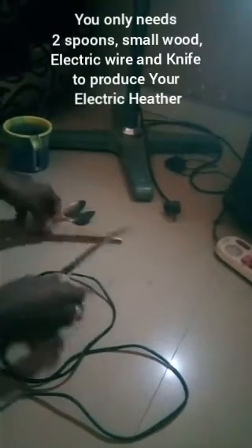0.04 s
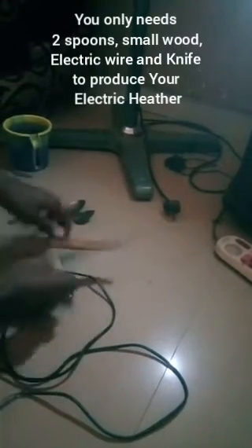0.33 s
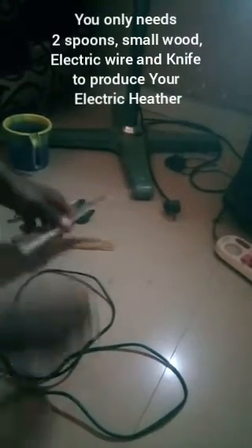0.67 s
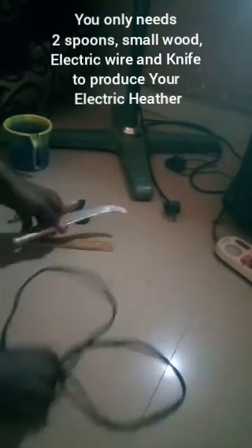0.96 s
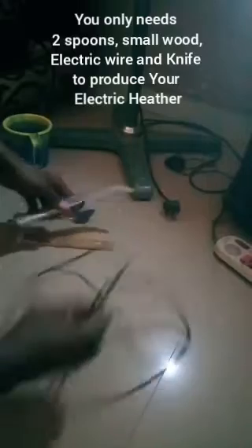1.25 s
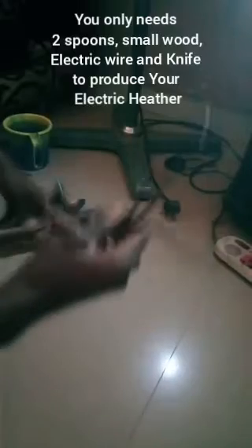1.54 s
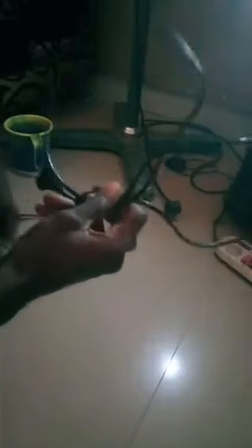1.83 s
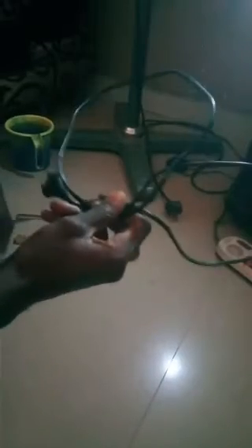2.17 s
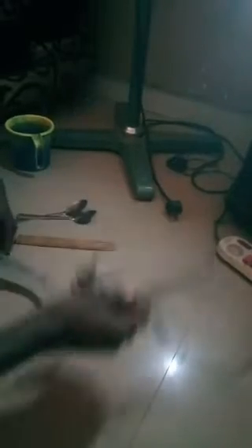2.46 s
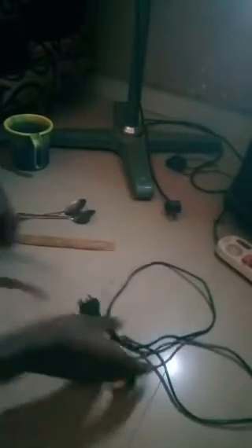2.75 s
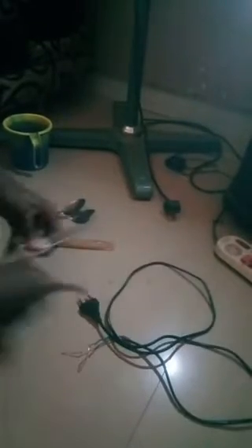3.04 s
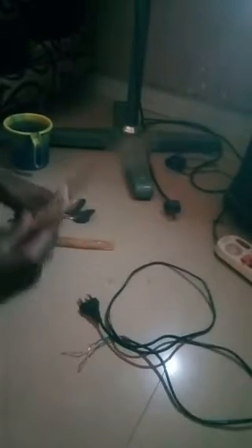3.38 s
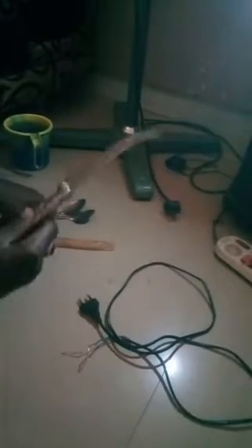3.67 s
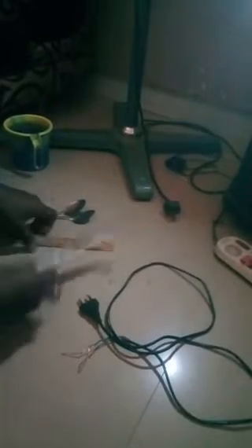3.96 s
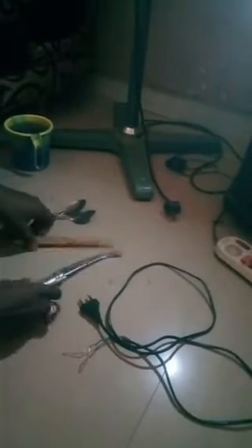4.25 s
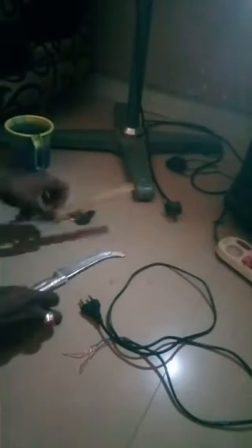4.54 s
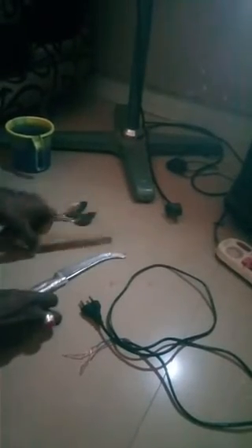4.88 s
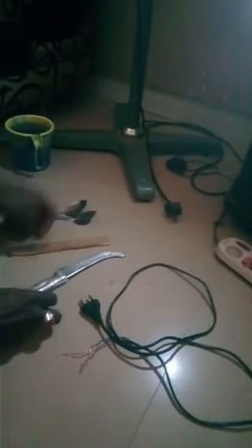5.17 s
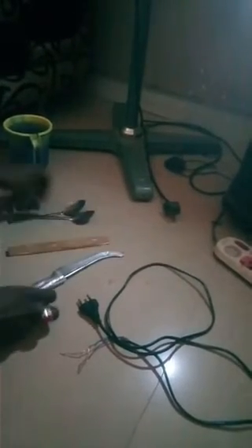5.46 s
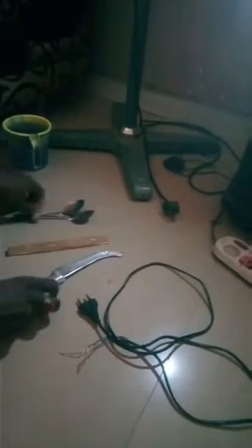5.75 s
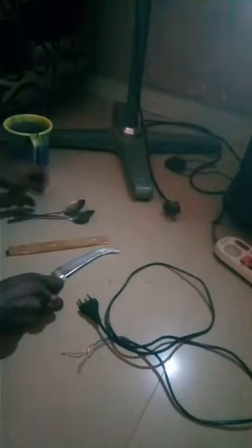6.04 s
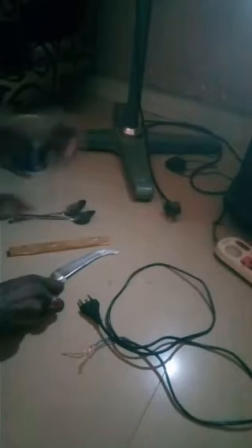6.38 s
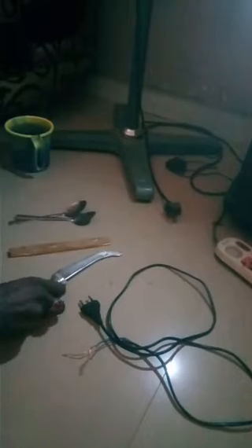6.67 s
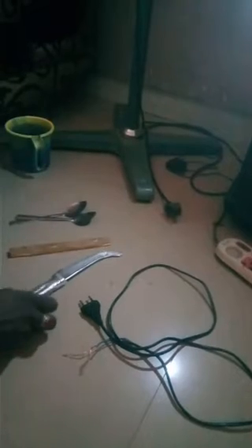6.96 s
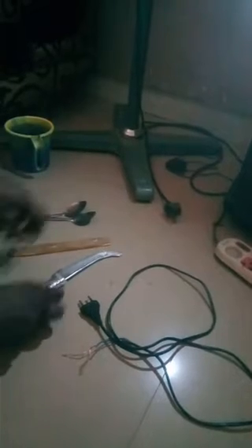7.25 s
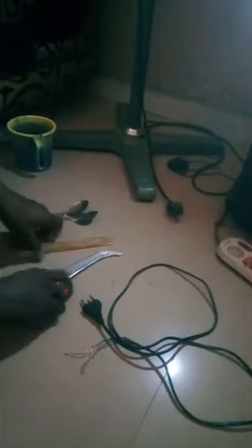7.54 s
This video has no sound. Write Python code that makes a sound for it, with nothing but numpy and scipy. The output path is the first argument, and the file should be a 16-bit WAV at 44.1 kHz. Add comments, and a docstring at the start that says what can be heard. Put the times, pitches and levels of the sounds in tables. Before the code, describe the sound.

In a small, quiet room, hands and a power cord slide faintly over a tiled floor with soft bumps. A knife is put down with dry taps, then a plug ticks on the tile. Midway, two steel spoons tumble together in a loud, bright, ringing clatter. A wooden stick and the knife tap lightly, and the spoons clink in three short bursts. The sound is close, with a short echo.

```python
"""In a small, quiet room, hands and a mains lead slide and softly bump over a tiled floor throughout. First a
knife is picked up with dry taps, then the plug. Just after 4 s two steel spoons tumble against each other and
the tile: each hit makes a sharp crack and sets their bowls and handles ringing. A wooden stick taps at 5 s,
then the knife again. From 6 s the spoons clink in three short bursts, with a fingernail tap before the last
one."""
import sys
import numpy as np
from scipy import signal
from scipy.fft import rfft, irfft
from scipy.io import wavfile

SR = 44100
rng = np.random.default_rng(int(sys.argv[2]) if len(sys.argv) > 2 else 0)


def dump(signal):
    """Clip the signal to [-1, 1] and save it as 16-bit WAV at the path in sys.argv[1]."""
    limited = np.clip(np.atleast_2d(signal).T, -1, 1)
    pcm = np.round(limited * 32767).astype(np.int16)
    wavfile.write(sys.argv[1], SR, pcm)


N = 340011
TIME = np.arange(N) / SR
# each hit of the spoons: (time [s], crack level [dB], pitch of the hit [Hz],
# ring of the first bowl [dB], ring of the second bowl [dB])
SPOON_HITS = [ (4.1845, -26.5, 4780, -35, -42.5), (4.1904, 0.5, 4310, -36, -38.5),
              (4.2562, -6.5, 3610, -27, -34.5), (4.2800, -8.5, 4700, -26, -25.5),
              (4.2984, -9.5, 3407, -32, -43), (4.3053, -12.5, 5000, -38.5, -34.5),
              (4.3191, -10, 3950, -33.5, -24), (4.3464, -23.5, 5000, -38.5, -29),
              (4.3724, -12, 4280, -34.5, -20.5), (4.3824, -3.5, 4100, -11.5, -21),
              (4.3922, -8.5, 4144, -19, -25), (4.4076, -17, 4280, -30, -18.5),
              (4.4288, -5.5, 5150, -25, -20), (4.4381, -9.5, 4210, -23.5, -16.5),
              (4.4464, -10, 5006, -20, -26.5), (4.4512, -12, 5000, -17.5, -30.5),
              (4.4608, -10.5, 5010, -29.5, -28.5), (4.4730, -19.5, 4570, -42, -23),
              (4.4804, -18, 5330, -26.5, -26.5), (4.4884, -6.5, 5170, -38, -23),
              (4.5084, -29, 4640, -22, -25), (4.5243, -20.5, 4800, -36, -35),
              (4.5324, -29, 4940, -37.5, -27), (5.9660, -51, 4800, -76, -58),
              (5.9848, -44, 3960, -83, -53.5), (6.719, -23, 3800, -64.5, -41),
              (6.7216, -8, 4400, -38.5, -18.5), (6.7324, -14.5, 4720, -29, -24),
              (6.7454, -15, 4780, -36, -53), (6.7735, -19, 4800, -33.5, -48),
              (7.646, -42, 3860, -51, -41.5), (7.659, -28, 5050, -74, -47),
              (7.6720, -25.5, 4230, -27.5, -32), (7.676, -26, 4500, -36, -51)]


def spoons(crack_db=-5, tumble_start_s=4.18, tumble_end_s=4.55):
    """Each hit cracks and sets the steel ringing; the handles ring most while the spoons tumble."""
    # tone colour of a crack on steel: (frequency [Hz], level [dB])
    steel_colour = [(150, -47.5), (400, -33), (650, -34), (1100, -26), (2000, -11.5), (2750, -17.5),
                    (3450, -3.5), (4400, -2), (4850, -3.5), (5450, -1), (6700, -5.5), (7600, -24),
                    (10000, -34.5), (12000, -46), (15500, -47)]
    # the notes each part rings at, high for the bowls and lower for the handles: (frequency [Hz])
    first_bowl_hz = [4544, 5004, 5122, 5237, 5274, 5324, 5365, 5650, 6702, 8450, 9520, 14190]
    second_bowl_hz = [2027, 3044, 3800, 4055, 4240, 4513, 4548, 4606, 5045, 6320, 8150, 9560, 10450]
    handle_hz = [1070, 1247, 1860, 2532, 3040, 3890, 4540]
    # the same notes, in the same order: (level [dB], time to fade by 60 dB [s])
    first_bowl_ring = [(-13.5, 0.15), (-0.5, 0.19), (-12.5, .26), (-13.5, 0.42), (-13, 0.14), (-5, 0.32),
                       (-12, .24), (-16, 0.29), (-10, 0.24), (-42.5, .15), (-33.5, 0.19), (-45.5, .15)]
    second_bowl_ring = [(-21.5, 0.29), (-6.5, 0.3), (-16.5, .15), (-19.5, .15), (0.5, 0.25), (-15.5, .18),
                        (-12, 0.18), (-13.5, 0.13), (-2.5, .36), (-12, .2), (-25.5, 0.15), (-26, 0.18),
                        (-37, 0.11)]
    handle_ring = [(-10, 0.3), (-16, .25), (-5.5, 0.78), (-7.5, 0.2042), (-8.5, 0.16), (3, 0.089),
                   (-11.5, 0.11)]
    parts = [(first_bowl_hz, first_bowl_ring), (second_bowl_hz, second_bowl_ring),
             (handle_hz, handle_ring)]
    part_notes = [(hz, ringing(np.c_[hz, ring], twin=0.27)) for hz, ring in parts]
    cracks, rings = np.zeros((2, N))
    for start_s, db, pitch_hz, first_db, second_db in SPOON_HITS:
        tilt_db_per_octave = max(5.1 + 0.63 * db, -3.5)  # a stronger hit is brighter
        click = crack(steel_colour, pitch_hz, tilt_db_per_octave, focus_db=7)
        add(cracks, start_s, from_db(db + crack_db) * chatter(click, rebound=0.68, settle_s=0.003))
        ring_left = damping(start_s)
        handle_db = db + (-25 if tumble_start_s < start_s < tumble_end_s else -42)
        for (hz, sines), gain in zip(part_notes, from_db([first_db, second_db, handle_db])):
            ring = strike(hz, sines, pitch_hz, focus_db=8.5, octaves=0.14)
            add(rings, start_s, gain * ring_left * ring)
    return cracks + rings + room(from_db(-3.5) * cracks + from_db(-5.5) * rings)


def damping(start_s, settle_s=0.0075, floor_db_per_s=180):
    """How much of a ring is left: later hits choke it, and the floor stills it once the spoons rest."""
    t = start_s + TIME[:SR // 2]
    # each later hit takes its share within 2 ms; a lighter one takes more
    choke_db = sum(max(6.5 - 0.1 * db, 0) * np.clip((t - later_s) / 0.002, 0, 1)
                   for later_s, db, *_ in SPOON_HITS if start_s < later_s < t[-1])
    resting_s = np.maximum(t - clatter_end(start_s) - settle_s, 0)
    return from_db(-choke_db - floor_db_per_s * resting_s)


def clatter_end(hit_s, pause_s=0.15):
    """Follow the spoon hits from hit_s on and give the time of the last one before a pause."""
    for later_s in sorted(row[0] for row in SPOON_HITS):
        if hit_s < later_s < hit_s + pause_s:
            hit_s = later_s
    return hit_s


def taps(crack_db=-3, even_tap_hz=4300):
    """Knife, plug, stick and fingernail crack on the tile and ring briefly, pitched by their size."""
    # each tap: (time [s], crack level [dB], pitch of the hit [Hz], object name)
    tile_taps = [ (0.28, -29, 5500, "knife"), (0.2834, -18.5, 3680, "knife"), (0.285, -28.5, 5860, "knife"),
                 (0.3004, -44, 3600, "knife"), (0.3560, -36, 3370, "knife"), (1.2500, -45, 5960, "plug"),
                 (1.2618, -37, 6100, "plug"), (2.5997, -30, 4450, "plug"), (2.608, -38, 4720, "plug"),
                 (2.6371, -21, 4330, "plug"), (2.6631, -24, 6560, "plug"), (2.6685, -24, 7160, "plug"),
                 (2.7980, -35, 4660, "plug"), (2.8401, -31, 4440, "plug"), (5.0052, -29, 3720, "stick"),
                 (5.1953, -24, 5000, "stick"), (5.2003, -25.5, 3770, "stick"),
                 (5.2498, -30.5, 3580, "stick"), (5.74, -37.5, 4530, "knife"), (5.7633, -42, 3400, "knife"),
                 (7.1430, -37.5, 5630, "fingernail")]
    # for each object name: (lowest note [Hz], ring added to the tap's level [dB], room share [dB])
    objects = {"knife": (1820, -29, -4.5), "plug": (1050, -37, -7), "stick": (1900, -23, -5),
               "fingernail": (2820, -38, -14)}
    # notes of the short ring: (multiple of the lowest note, level [dB], time to fade by 60 dB [s])
    tap_notes = [(1, 3, 0.03), (1.031, -1.5, 0.05), (1.52, -6, 0.026), (1.871, 5, 0.036),
                 (2.24, 9.5, 0.015), (2.85, -4, 0.024)]
    # tone colour of a tap's crack: (frequency [Hz], level [dB])
    tap_colour = [(200, -27), (600, -29.5), (1000, -25), (2200, -9), (2900, -3), (3700, 0.5), (5500, 3.5),
                  (6600, -5.5), (7800, -19.5), (10500, -35), (13000, -48), (15500, -52)]
    direct, to_room = np.zeros((2, N))
    for start_s, db, pitch_hz, name in tile_taps:
        lowest_hz, ring_db, room_db = objects[name]
        notes = np.array(tap_notes) * [lowest_hz, 1, 1]
        ring = strike(notes[:, 0], ringing(notes), pitch_hz, focus_db=4, octaves=0.1)
        knock = from_db(db + ring_db) * ring
        tilt_db_per_octave = 18 * np.log2(pitch_hz / even_tap_hz)  # a sharper tap is higher and brighter
        click = crack(tap_colour, pitch_hz, tilt_db_per_octave, focus_db=9)
        add(knock, 0, from_db(db + crack_db) * chatter(click, rebound=0.94, settle_s=0.002))
        add(direct, start_s, knock)
        add(to_room, start_s, from_db(room_db) * knock)
    return direct + room(to_room)


def crack(colour, pitch_hz, tilt_db_per_octave, focus_db, size=2048):
    """The click of two hard things meeting, with a peak of 1; more tilt makes it brighter."""
    hz = np.fft.rfftfreq(size, 1 / SR)
    tilt_db = tilt_db_per_octave * np.log2(np.maximum(hz, 500) / pitch_hz)
    db = at_hz(colour, hz) + favour_db(hz, pitch_hz, focus_db, octaves=0.17) + tilt_db
    # keep the tone colour but pack the energy at the very start (minimum phase)
    cepstrum = irfft(np.log(from_db(db)))
    cepstrum[size // 2:] = 0
    click = irfft(np.exp(2 * rfft(cepstrum)))
    return click / np.abs(click).max()


def chatter(click, rebound, settle_s, count=9):
    """A light object bounces several times within a few milliseconds, ever more weakly."""
    click = np.pad(click, (0, SR // 20))
    delays_s = np.cumsum(rng.uniform(0.00037, 0.0014, count))
    sizes = rng.choice([-1, 1], count) * rebound * np.exp(-delays_s / settle_s)
    return click + sum(size * np.roll(click, round(s * SR)) for s, size in zip(delays_s, sizes))


def ringing(notes, contact_s=0.0005, twin=0, detune=0.0057):
    """One fading sine per note, growing while the hit lasts; a slightly higher twin makes it waver."""
    hz, db, fade_s = np.transpose(notes)[:, :, None]
    t = TIME[:SR // 2]
    phase = 2 * np.pi * hz * t
    sines = np.sin(phase) + twin * np.sin(phase * (1 + detune))
    attack = 1 - np.exp(-(t / contact_s) ** 2)
    return from_db(db - 60 * t / fade_s) * sines * attack


def strike(hz, sines, pitch_hz, focus_db, octaves, spread_db=2.5):
    """Each hit sets the notes going in its own, partly random, mix."""
    db = favour_db(hz, pitch_hz, focus_db, octaves) + spread_db * rng.standard_normal(len(hz))
    return from_db(db) @ sines


def favour_db(hz, pitch_hz, depth_db, octaves):
    """The spot that is struck favours one pitch; frequencies far from it are depth_db weaker."""
    return depth_db * (np.exp(-(np.log2(np.maximum(hz, 1) / pitch_hz) / octaves) ** 2) - 1)


def sliding(hiss_db=-3.5, drag_db=-7.0):
    """With each stroke, skin hisses on the tile and the cable drags with a lower rasp."""
    # each stroke over the floor: (start [s], length [s], skin level [dB], cable level [dB])
    strokes = [ (0.0, 0.041, -58, -51.5), (0.028, 0.38, -58.5, -65.5), (0.309, 0.061, -83, -52),
               (0.54, 0.09, -62, -59.5), (0.655, 0.14, -56.5, -63.5), (0.754, 0.21, -63.5, -66),
               (0.897, 0.092, -68, -59), (0.985, 0.23, -64.5, -65.5), (1.227, 0.056, -62.5, -82),
               (2.51, 0.2, -62.5, -62.5), (2.703, 0.28, -66, -70.5), (3.32, 0.07, -68.5, -72),
               (3.754, 0.22, -65.5, -67), (3.958, 0.31, -65.5, -64.5), (4.87, 0.24, -62.5, -67),
               (5.593, 0.071, -68, -78.5), (5.87, 0.14, -65.5, -69.5), (6.5, 0.26, -62.5, -74.5),
               (6.889, 0.14, -61.5, -67), (7.176, 0.44, -58.5, -74)]
    # tone colours of sliding skin and dragging cable: (frequency [Hz], level [dB])
    skin_colour = [(1470, -25.5), (2500, -10), (2980, -13), (3150, -3.5), (3580, -2), (4290, 1.5),
                   (4620, 2.5), (6140, -3), (7790, -27), (10000, -41.5), (13000, -46), (22000, -120)]
    cable_colour = [(300, -6.5), (520, -10), (780, 1.5), (1200, -2.5), (1700, 5), (2050, 2.5),
                    (2700, -23.5), (4000, -35)]
    skin, cable = np.zeros((2, N))
    for start_s, length_s, skin_db, cable_db in strokes:
        speed = envelope(start_s, length_s, rise_s=0.1, fall_s=0.024)
        skin = np.maximum(skin, from_db(skin_db + hiss_db) * speed)
        cable = np.maximum(cable, from_db(cable_db + drag_db) * speed)
    hiss = skin * noise(skin_colour) * grip(per_s=56, depth_db=1.5)
    rasp = cable * noise(cable_colour) * grip(per_s=28, depth_db=2.0)
    return hiss + rasp


def grip(per_s, depth_db):
    """One surface grips another unevenly, so the level flickers at random."""
    times = np.arange(0, TIME[-1] + 1, 1 / per_s)
    return from_db(depth_db * np.interp(TIME, times, rng.standard_normal(len(times))))


def bumps(bump_db=-3.5, colour_pitch_hz=73):
    """Hands land softly on the floor with a short, low rumble."""
    # each landing: (time [s], level [dB], pitch [Hz])
    landings = [(0.0, -56, 73), (0.33, -54, 76), (0.61, -54, 70), (0.69, -65, 135), (0.95, -59, 73),
                (4.04, -64, 135), (6.78, -61.5, 150), (6.92, -65.5, 140)]
    # tone colour of a bump pitched at colour_pitch_hz: (frequency [Hz], level [dB])
    bump_colour = [(30, -16), (55, 1), (73, 11.5), (95, 2), (150, 2.5), (300, -48.5)]
    thuds = np.zeros(N)
    for start_s, db, pitch_hz in landings:
        rumble = noise(np.array(bump_colour) * [pitch_hz / colour_pitch_hz, 1])
        swell = envelope(start_s, length_s=0.04, rise_s=0.04, fall_s=0.1)
        thuds += from_db(db + bump_db) * swell * rumble
    return thuds


def room(sound, build_s=0.0024):
    """Echoes from the hard walls build up quickly, blur together and die sooner in the treble."""
    # how long the echoes last: (frequency [Hz], time to fade by 60 dB [s])
    echo_fade = [(300, 0.3), (2000, .34), (5000, 0.24), (8000, 0.14), (15000, 0.11)]
    t = TIME[:SR * 3 // 4]
    hz = np.fft.rfftfreq(len(t), 1 / SR)
    white = rfft(rng.standard_normal(len(t)))
    edges_hz = np.geomspace(100, 16000, 12)
    tail = np.zeros(len(t))
    for low, high in zip(edges_hz, edges_hz[1:]):
        band = irfft(white * ((hz >= low) & (hz < high)), len(t))
        tail += band * from_db(-60 * t / at_hz(echo_fade, np.sqrt(low * high)))
    tail *= 1 - np.exp(-t / build_s)
    return signal.fftconvolve(sound, tail / np.linalg.norm(tail))[:N]


def hush(level_db=-67.5):
    """The faint, steady, mostly low noise of the quiet room."""
    # its tone colour: (frequency [Hz], level [dB])
    hush_colour = [(25, -19), (40, -12), (60, -4.5), (100, -1.5), (156, -2.5), (246, -6.5), (400, -10),
                   (700, -14), (1400, -16), (3000, -21), (5000, -20), (6300, -24.5), (8000, -35.5),
                   (15500, -36.5)]
    return from_db(level_db) * noise(hush_colour)


def noise(colour):
    """Noise with a given tone colour and an average size (rms) of 1."""
    hz = np.fft.rfftfreq(N, 1 / SR)
    coloured = irfft(rfft(rng.standard_normal(N)) * from_db(at_hz(colour, hz)), N)
    return coloured / coloured.std()


def envelope(start_s, length_s, rise_s, fall_s):
    """A level that rises smoothly, holds until the length is over, then dies away."""
    t = TIME - start_s
    attack = np.sin(np.pi / 2 * np.clip(t / min(rise_s, length_s), 0, 1))
    return attack * np.exp(-np.clip((t - length_s) / fall_s, 0, 20))


def from_db(db):
    """Turn decibels into a factor to multiply a sound by."""
    return 10 ** (np.asarray(db) / 20)


def at_hz(table, hz):
    """Read between the rows of a frequency table, with every octave equally wide."""
    table_hz, values = np.transpose(table)
    return np.interp(np.log(np.maximum(hz, 1)), np.log(table_hz), values)


def add(track, start_s, sound):
    """Mix a sound into a track at the given time."""
    i = round(start_s * SR)
    track[i:i + len(sound)] += sound[:N - i]


def scene():
    """Clinks and taps over the sliding, the bumps and the room's hush, in one channel."""
    return (spoons() + taps() + sliding() + bumps() + hush())[None]


def record(dry, cutoff_hz=15400):
    """Cut off the very highest treble steeply."""
    return signal.sosfilt(signal.ellip(10, 0.2, 80, cutoff_hz, fs=SR, output="sos"), dry)


dry = scene()
out = record(dry)
dump(out)
```